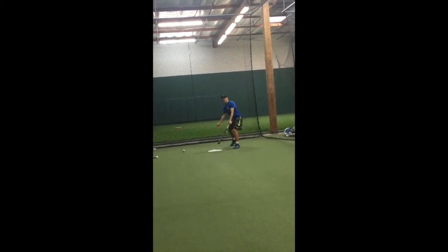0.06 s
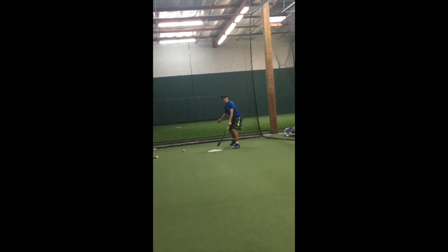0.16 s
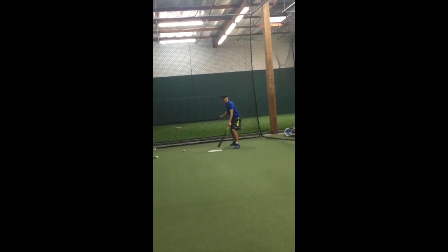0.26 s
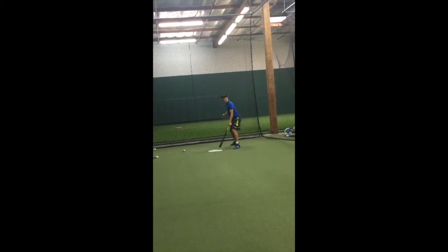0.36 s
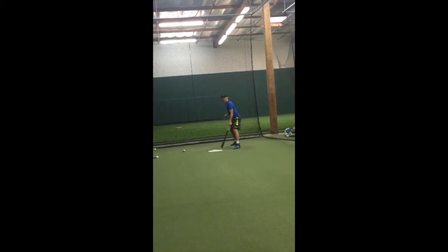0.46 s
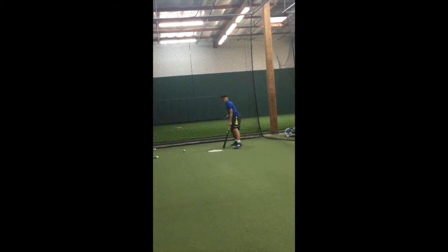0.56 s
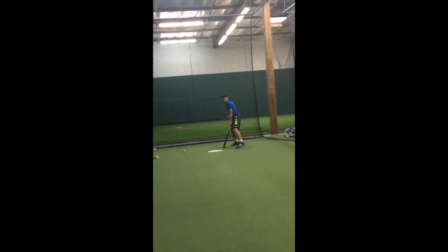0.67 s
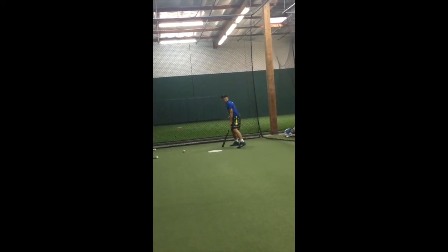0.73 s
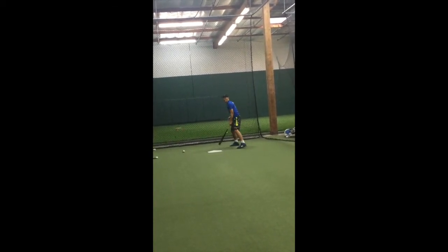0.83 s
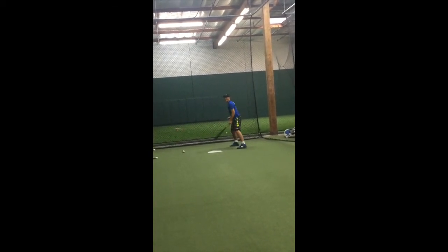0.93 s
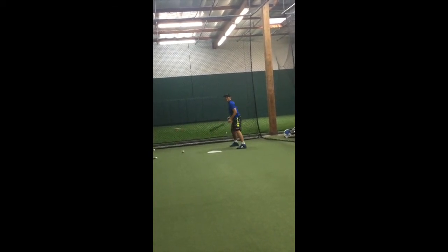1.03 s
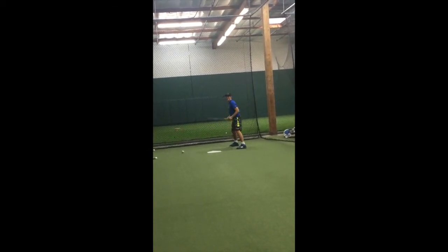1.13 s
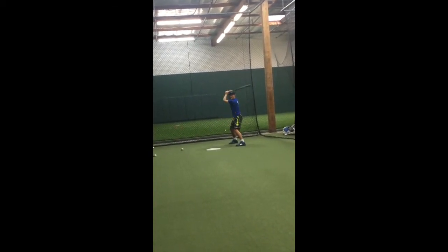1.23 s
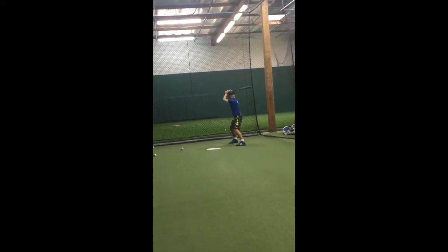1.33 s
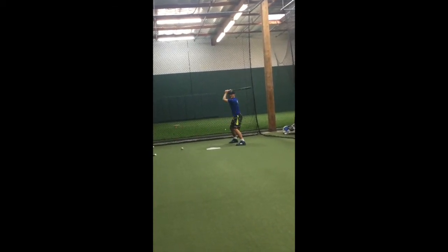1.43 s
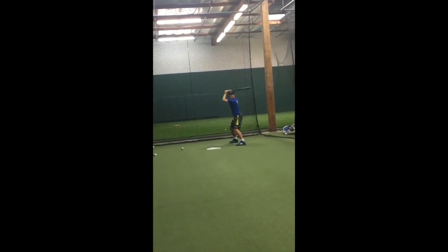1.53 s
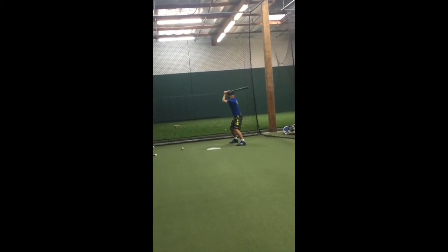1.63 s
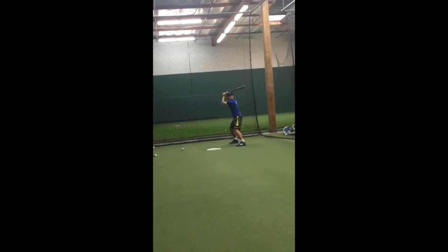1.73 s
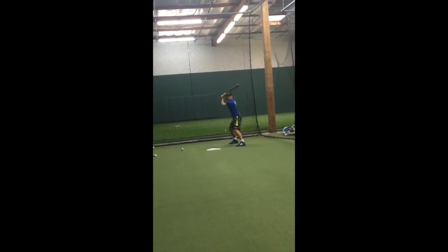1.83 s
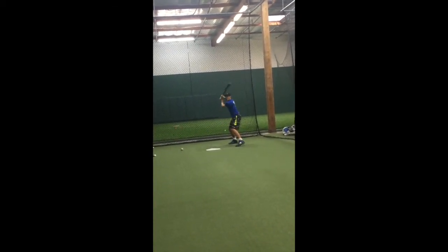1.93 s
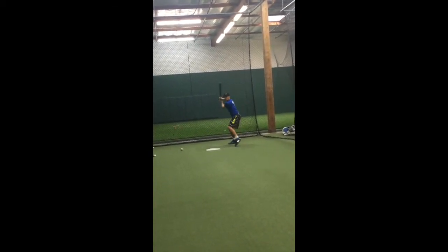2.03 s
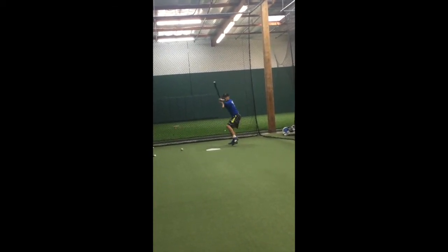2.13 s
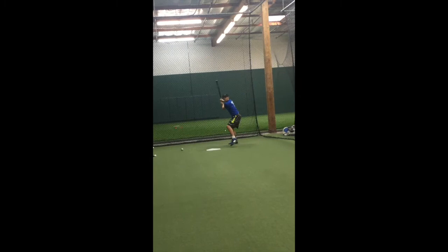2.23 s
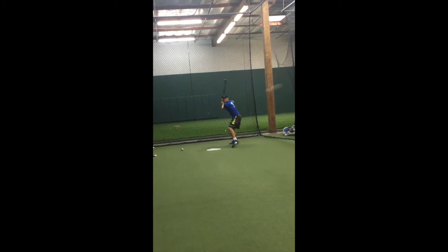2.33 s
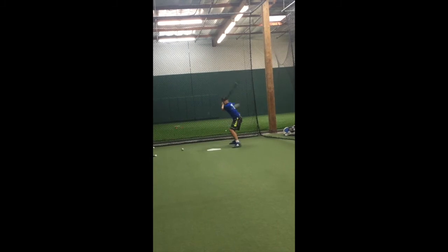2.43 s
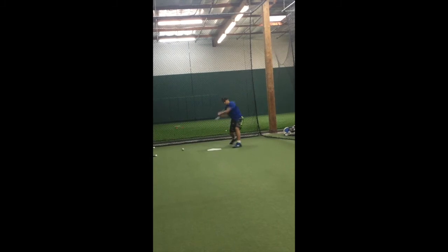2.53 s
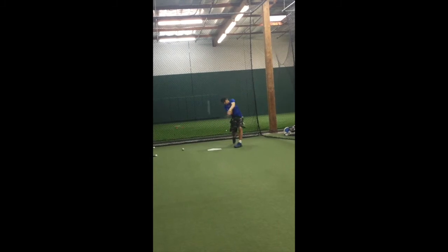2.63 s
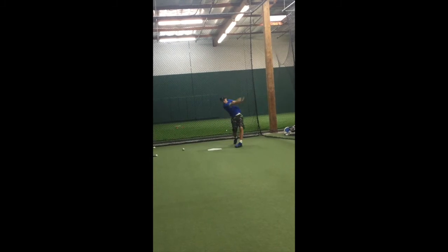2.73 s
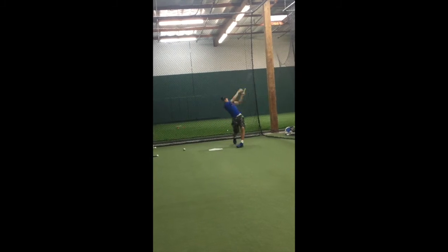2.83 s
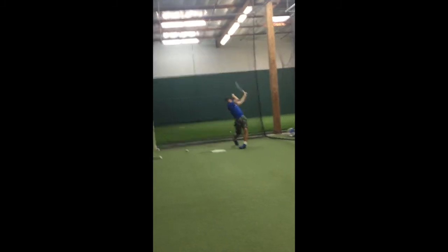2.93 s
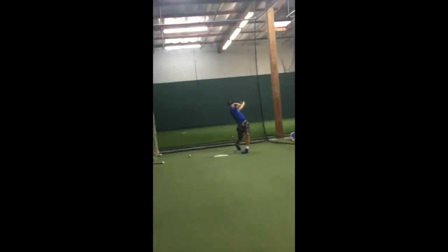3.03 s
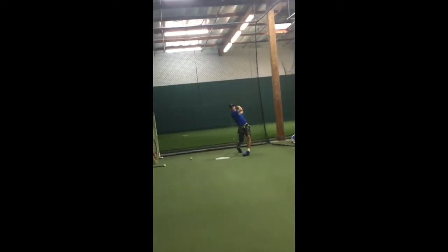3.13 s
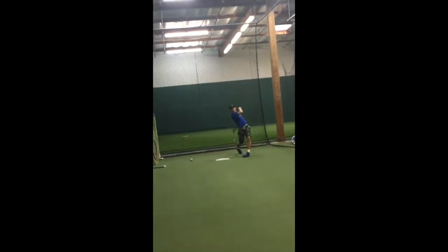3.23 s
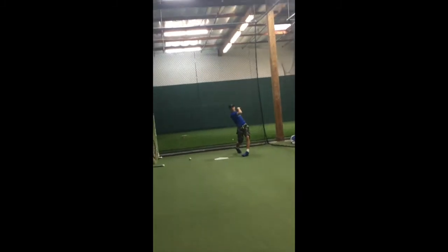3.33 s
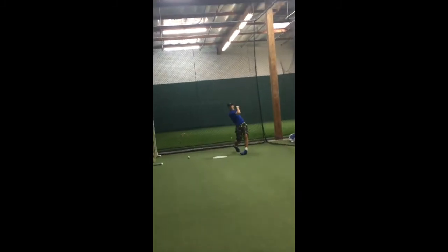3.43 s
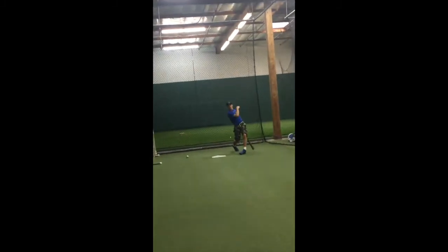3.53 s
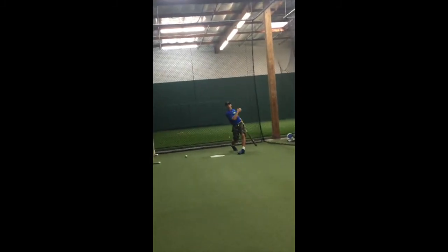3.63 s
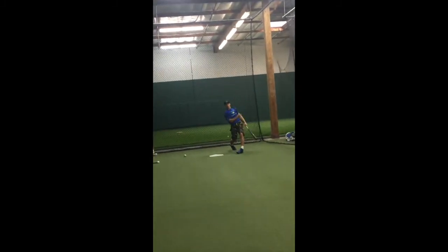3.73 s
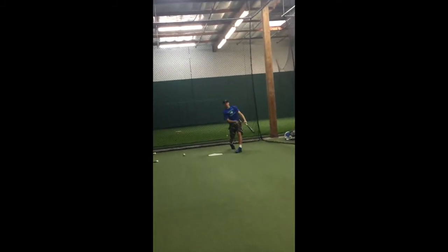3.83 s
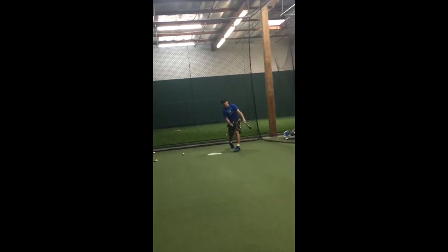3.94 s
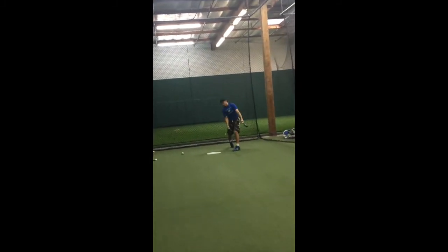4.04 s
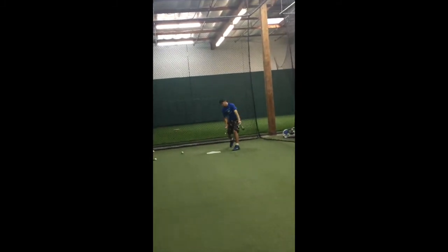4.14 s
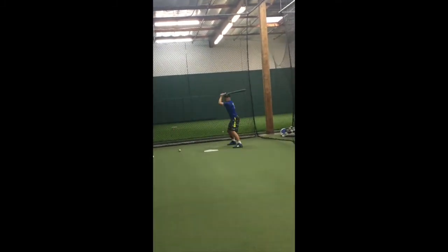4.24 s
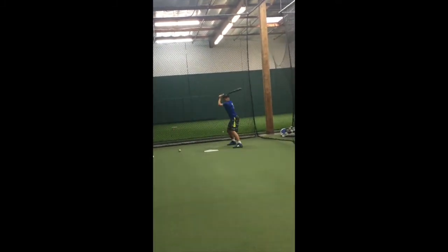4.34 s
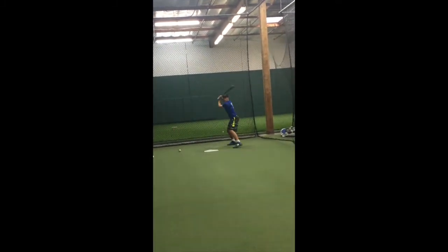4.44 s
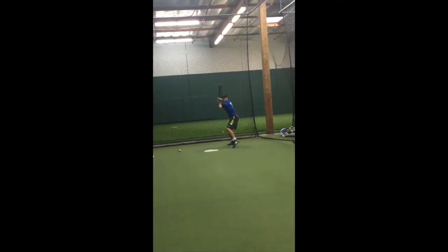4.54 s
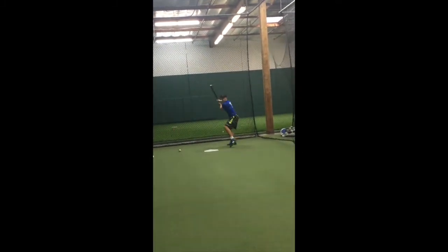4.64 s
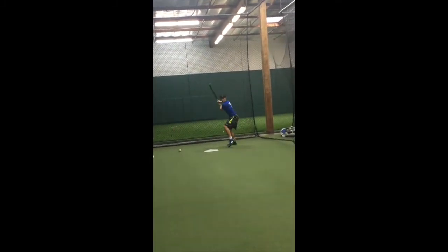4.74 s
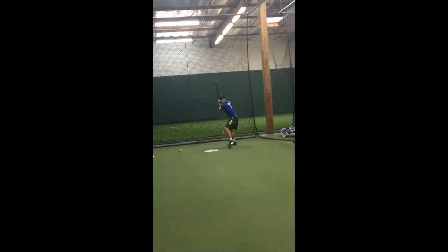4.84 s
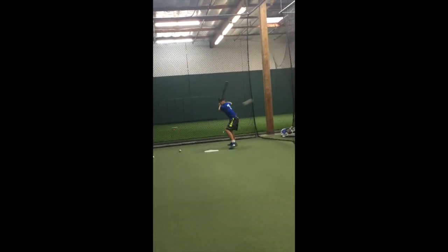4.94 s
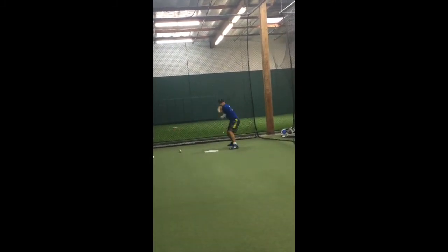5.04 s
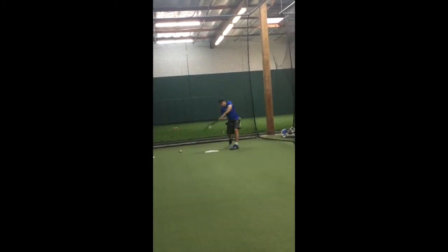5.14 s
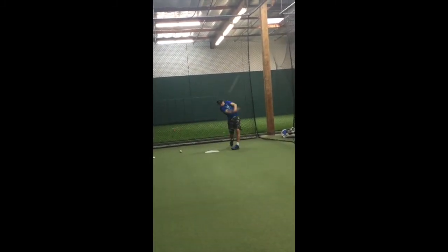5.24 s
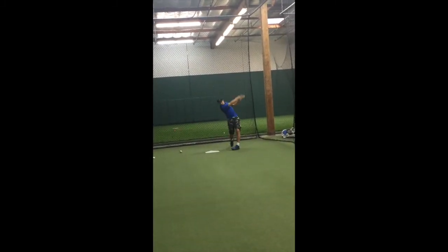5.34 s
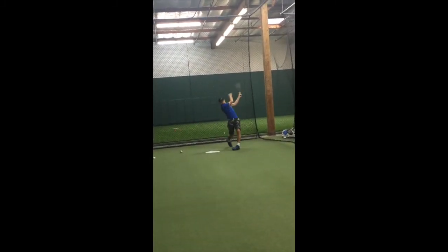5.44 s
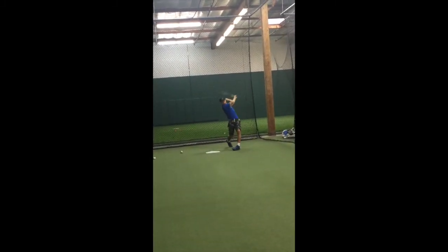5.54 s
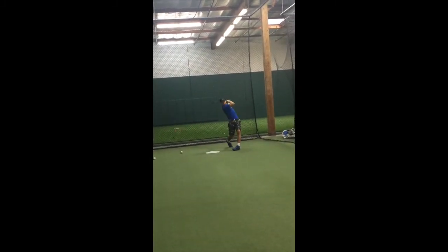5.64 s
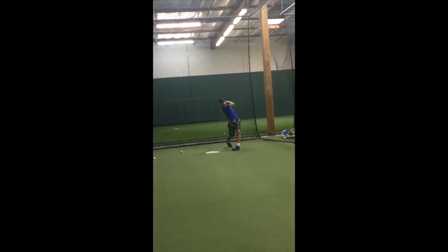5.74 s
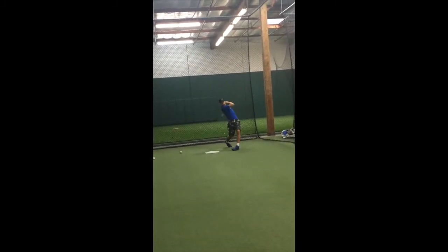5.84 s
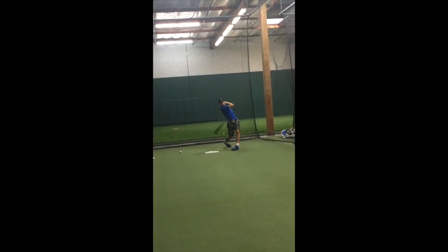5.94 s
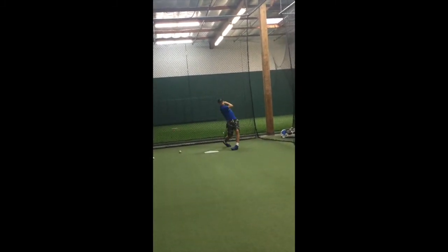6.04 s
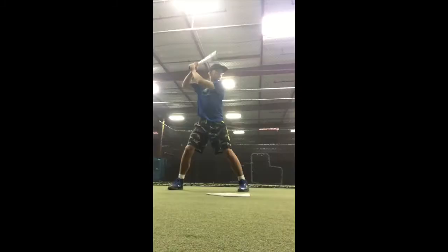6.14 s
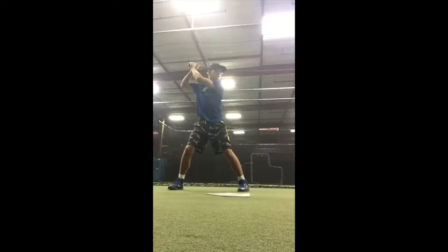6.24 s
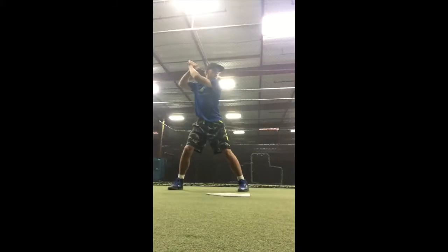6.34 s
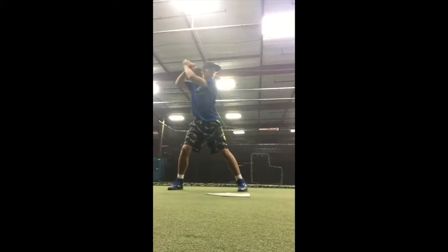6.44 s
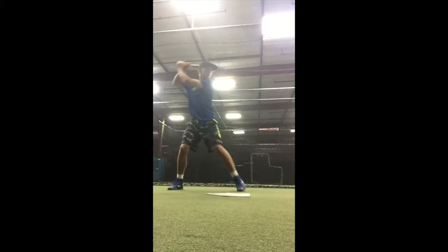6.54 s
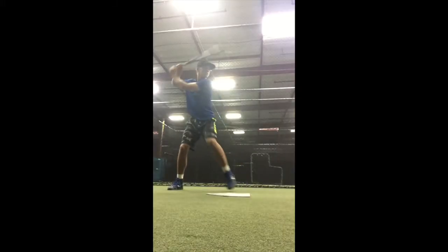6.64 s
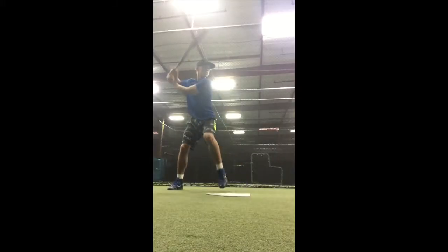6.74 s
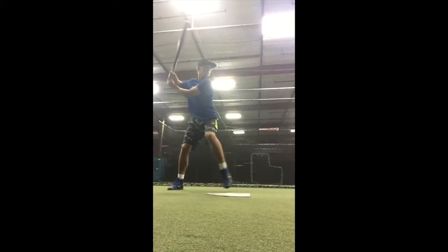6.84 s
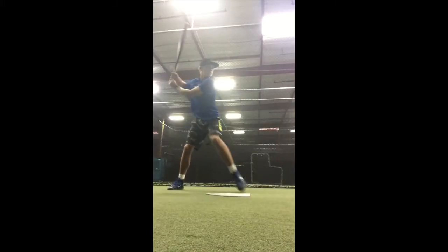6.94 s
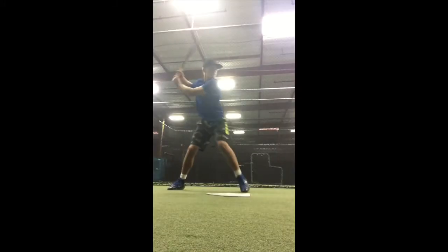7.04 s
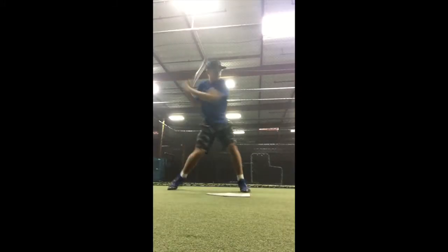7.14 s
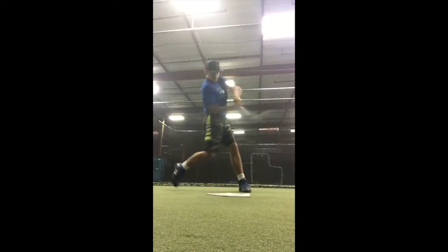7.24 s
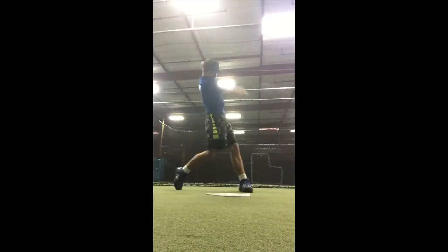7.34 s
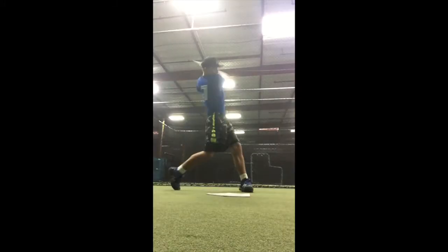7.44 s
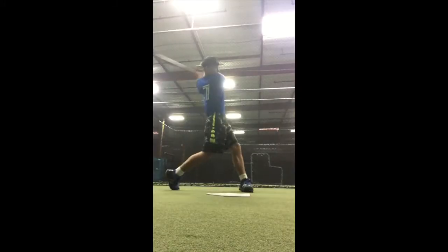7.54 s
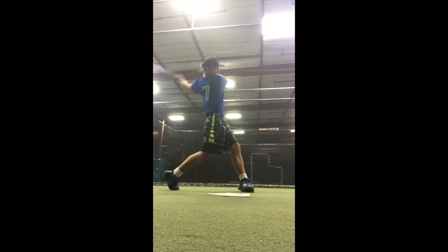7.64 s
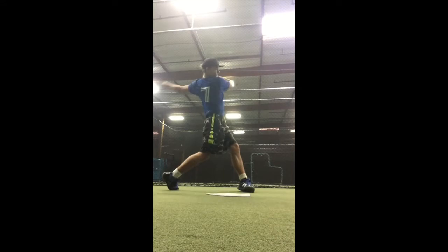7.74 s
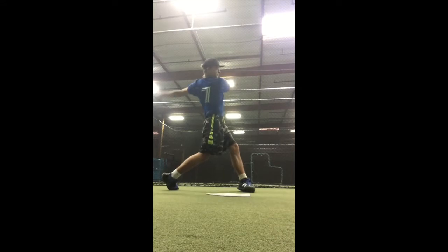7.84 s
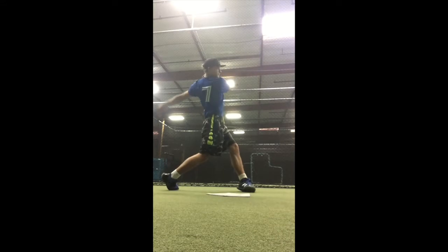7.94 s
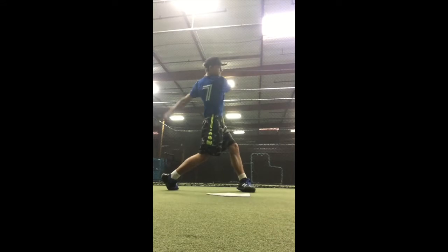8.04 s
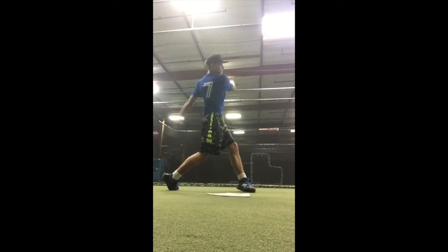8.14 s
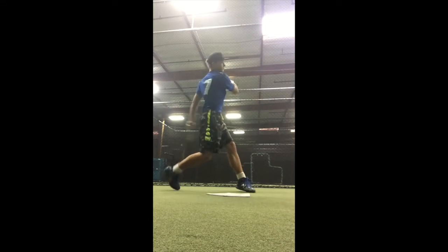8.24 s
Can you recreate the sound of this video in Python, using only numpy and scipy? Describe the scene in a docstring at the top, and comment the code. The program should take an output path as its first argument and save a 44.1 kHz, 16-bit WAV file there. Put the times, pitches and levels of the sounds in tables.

```python
"""Batting practice in a large metal-roofed hall, over rumbling ventilation (coloured noise).
First the hall still rings from an earlier hit; knocks (pulse and click), a bat scrape and a shoe scuff follow.
At 2.7 s and 5.3 s a bat cracks across the turf (noise snap, damped modes, wall slaps); nets hiss as noise.
The first hit's ring is cut at 4.3 s. At 6.1 s the microphone jumps close: ringing stops, the rumble weakens.
At 7.3 s a close crack comes with a rush of air, then follow-through, net and hall; each crack overloads."""
import sys
import numpy as np
from scipy import signal
from scipy.fft import rfft, irfft, next_fast_len
from scipy.io import wavfile
from scipy.ndimage import uniform_filter1d

SR = 44100
rng = np.random.default_rng(int(sys.argv[2]) if len(sys.argv) > 2 else 0)


def unload_wav(signal):
    """Save mono or channel-first audio to the path in sys.argv[1] as 16-bit WAV at rate SR, clipped to [-1, 1]."""
    wavfile.write(
        sys.argv[1],
        SR,
        np.round(np.clip(np.atleast_2d(signal).T, -1, 1) * 32767).astype(np.int16),
    )


N = 365148
TIME = np.arange(N) / SR
MOVE_S = 6.133  # the microphone jumps from the far spot to the close one
TOP_HZ = 15600  # upper band limit of the microphone

# Bat on ball: [t/s, crack level/dB, turf bounce re crack/dB, pock re snap and ring/dB,
# first scattered echoes level/dB, hall level/dB, echo brightness/(dB per octave),
# flight to the net t/s, net level/dB]
HITS = [(2.7117, 1, -9, -24, -22.5, -22.5, 1.13, 0.17, -41.5),
        (5.2656, -3.5, -1.5, -11, -19.5, -25, -1.1, .2454, -35),
        (7.3122, -0.5, -6, -1.5, -21, -28, -0.97, .2778, -42.5)]
# Short ring of bat and ball: [f/Hz, level/dB, t60/s]
BAT_MODES = [(1060, -23, 0.046), (1390, -17, 0.033), (2214, -12, .02), (2560, -7, 0.018), (2964, -9, 0.026),
             (3150, -2.5, 0.015), (3990, -10, 0.011), (6210, -17.5, .012)]
# Low bending modes of the bat, inside the pock: [f/Hz, level/dB, t60/s]
BENDING_MODES = [(320, -9.5, 0.033), (566, -12, 0.035), (822, -9.5, 0.02), (1074, -3.5, 0.034)]
# Knocks and footfalls: [t/s, thump f/Hz, thump level/dB, click level/dB]
KNOCKS = [(0.1203, 122, -31, -31), (1.0634, 221, -32, -42.5), (3.955, 189, -24.5, -35),
          (4.72, 122, -37, -57.5), (6.194, 111, -50, -59.5), (7.021, 100, -51, -65)]
# Rubs of shoes and clothes in every swing: weight shift, front foot lift, stride, hips and bat coming round
# [lead before contact at unit slowness t/s, far level/dB, close level/dB, rise t/s, fall t/s,
# treble tilt before the spot's own/(dB per octave)]
SWING_RUBS = [(.715, -65, -63, 0.053, 0.058, 0.5), (.542, -61, -68.5, 0.018, .028, 2.5),
              (0.13, -64.5, -56, 0.055, .04, 2.5), (.03, -57, -46.5, .036, .08, 4)]
# Further single scuffs, between and during swings: [peak t/s, level/dB, fall t/s]
SCUFFS = [(1.599, -60, 0.028), (3.985, -55, 0.082), (4.47, -64, 0.027), (7.027, -54, 0.013)]
# Resonances of the scraped bat tip: [f/Hz, width f/Hz, relative level/dB]
SCRAPE_MODES = [(976, 110, 4), (2400, 90, -7), (3460, 91, -7), (4300, 120, -13), (5950, 63, -15)]
# The net stirs again: [t/s, level/dB, t60/s]
RUSTLES = [(3.19, -58, 0.33), (3.582, -58.5, 0.16), (5.8, -59, 2.5), (8.115, -55, 0.21)]
# Metal fittings of the net: [t/s, f/Hz, level/dB, t60/s]
JINGLES = [(5.579, 9160, -53, 0.53), (5.8, 11450, -75, 1.4)]
# When ringing and net hiss break off: [t/s]
CUTS_S = [4.3, MOVE_S]
# Decay time of the hall: [f/Hz, t60/s]
HALL_T60 = [(100, 0.86), (500, 2.34), (1200, 2.55), (3000, 2.595), (5000, 1.51), (8000, 1.05), (14000, .6)]

# Noise colours, all [f/Hz, relative level/dB per Hz]: snap of the contact
SNAP_COLOUR = [(40, -20), (250, -9.5), (500, -15.5), (1000, -9), (2000, -1), (3100, -1.5), (4700, -8.5),
               (6500, -8.5), (8500, -14.5), (12500, -19), (16000, -22)]
# Echoes off near surfaces and walls: [f/Hz, relative level/dB per Hz]
WALL_COLOUR = [(40, -26), (250, -15), (500, -12), (1000, -5.5), (2000, 1), (3100, 1.5), (4300, -4),
               (6000, -7), (7500, -15), (12000, -20.5), (16000, -26.5)]
# Reverberation of the sharp, bright cracks: [f/Hz, relative level/dB per Hz]
HALL_BRIGHT = [(40, -17), (120, -11), (400, -16), (780, -12.5), (1250, -5), (1850, -6), (2350, -2),
               (3100, -1.5), (3800, -7), (5500, -10), (7700, -20), (15000, -35)]
# Reverberation of the lower crack: [f/Hz, relative level/dB per Hz]
HALL_LOW = [(40, -15), (110, -3), (350, -4.5), (650, -13), (870, -6.5), (1030, 4), (1250, -4), (1560, 1.5),
            (1850, -2), (2900, -4), (4200, -6.5), (6000, -6), (9000, -20), (15000, -35)]
# Reverberation left from an earlier hit: [f/Hz, relative level/dB per Hz]
HALL_EARLIER = [(100, -5), (700, -21), (1050, -1.5), (1300, -2), (1650, 2), (2600, -4), (3300, -10.5),
                (5000, -19), (12000, -19)]
# Click of a knock: [f/Hz, relative level/dB per Hz]
KNOCK_COLOUR = [(60, -8.5), (200, 10), (380, 7.5), (600, -1.5), (950, 4), (1300, -2.5), (2000, -1),
                (3500, -9), (5000, -23), (8000, -37), (15000, -51)]
# Shoe or cloth: [f/Hz, relative level/dB per Hz]
RUB_COLOUR = [(100, -13), (500, -9), (1100, 1), (2300, 0.5), (4000, -8.5), (7000, -15.5), (15000, -36.5)]
# Netting: [f/Hz, relative level/dB per Hz]
NET_COLOUR = [(500, -40), (2500, 12), (5000, 9.5), (9000, 0.5), (15000, -12)]
# Ventilation at the far spot: [f/Hz, relative level/dB per Hz]
RUMBLE_FAR = [(22, -34.5), (45, -0.5), (75, 4.5), (130, 0.5), (210, -3), (330, -10), (500, -19),
              (1000, -30.5), (3000, -35), (7000, -43.5), (15000, -51.5)]
# Ventilation close by, squashed ball, air ahead of the bat, follow-through: [f/Hz, relative level/dB per Hz]
RUMBLE_CLOSE = [(20, -22.5), (50, 0.5), (85, 1.0), (150, -7.0), (400, -19), (1500, -18.5),
                (4000, -26.5), (15000, -38)]
SQUASH_COLOUR = [(60, -20.5), (150, -11.5), (280, -0.5), (900, 1), (1300, -4.5), (2500, -26)]
AIR_COLOUR = [(30, -12), (110, -1), (200, -15.5), (400, -12), (1500, -28.5), (8000, -47.5)]
FOLLOW_COLOUR = [(20, -8), (45, -6), (85, 1.5), (160, -14), (400, -29.5), (2000, -58)]

NET_T60, SCATTER_T60 = .53, .5  # s, net after a catch; first scattered echoes
SLAP_S, SLAP_DB, SLAP_EDGE_HZ = .0994, -6, 4700  # first answer of a far wall
ROUND_TRIP_S = .2555  # there and back between the walls
# Wall-to-wall echoes: reference level, loss a round trip, treble edge
FLUTTER_DB, FLUTTER_LOSS_DB, FLUTTER_EDGE_HZ = -18, 6, 4250
KNOCK_NEAR_DB, KNOCK_HALL_DB = -11, -26  # nearby surfaces and hall, relative to the click
SCUFF_RISE, SCUFF_TILT_DB = 0.48, -0.4  # rise as a share of the fall; treble per octave
# The two microphone spots: nearby reflections (start, hold, decay in s; level re crack in dB),
# colour of the reverberation of the cracks heard there, stretch of the swing's timing,
# extra treble of its rubs in dB per octave
FAR = dict(near_delay_s=.012, near_length_s=.0115, near_t60=.04, near_db=-13.8,
           hall=HALL_BRIGHT, slowness=1, rub_tilt_db=0)
CLOSE = dict(near_delay_s=.0293, near_length_s=.002, near_t60=.07, near_db=-18.5,
             hall=HALL_LOW, slowness=1.17, rub_tilt_db=-4)


def hits():
    """Each crack arrives directly, off the turf, off nearby surfaces, off the walls, and as reverberation."""
    out, t = np.zeros(N), TIME[:SR]
    for s, db, turf_db, pock_db, scatter_db, hall_db, tilt_db, _, _ in HITS:
        swing, spot = np.zeros(N), spot_at(s)
        delay = spot["near_delay_s"]
        add(swing, s, amp(db) * crack(pock_db))
        add(swing, s + .0038, amp(db + turf_db) * crack(pock_db - 6.0))
        # nearby surfaces: silent until the delay, held, then decaying
        held = np.maximum(t - delay - spot["near_length_s"], 0)
        cluster = (t > delay) * fade(held, spot["near_t60"])
        add(swing, s, amp(db + spot["near_db"]) * cluster * noise(WALL_COLOUR, SR, tilt_db))
        scatter = fade(t, SCATTER_T60) * (1 - np.exp(-t / delay))
        scattered = scatter * noise(WALL_COLOUR, SR, tilt_db - .5)
        add(swing, s, amp(scatter_db) * ragged(scattered, depth=0.71))
        add(swing, s, amp(hall_db) * ragged(hall_tail(spot["hall"], tilt_db), depth=.25))
        if spot is FAR:  # this spot lies in the path of the wall-to-wall flutter
            add(swing, s, flutter(pock_db))
        out += swing * until_cut(s)
    # the hall still rings from an earlier hit
    earlier = hall_tail(HALL_EARLIER) * fade(TIME[:3 * SR], 10.6)
    add(out, -.85, amp(-23.5) * earlier)
    return out


def crack(pock_db):
    """A splintery snap, the bat's short ring, and a low pock from the bending bat and the squashed ball."""
    t = TIME[:SR // 8]
    snap = noise(SNAP_COLOUR, len(t)) * fade(t, 0.013)
    squash = noise(SQUASH_COLOUR, len(t)) * fade(t, 0.029)
    pock = ringing(BENDING_MODES, t) + amp(-4) * squash
    return amp(-3.5) * snap + ringing(BAT_MODES, t) + amp(pock_db) * pock


def ringing(modes, t):
    """Damped modes, a little different in strength and pitch at every blow."""
    out = np.zeros(len(t))
    for hz, db, t60 in modes:
        gain = amp(db + rng.normal(0, 0.68))
        pitch = hz * rng.normal(1, 0.0087)
        phase = rng.uniform(0, 2 * np.pi)
        out += gain * np.sin(2 * np.pi * pitch * t + phase) * fade(t, t60)
    return out


def flutter(pock_db, count=3):
    """A far wall slaps back; then crack and slap shuttle between the walls, weaker at every round trip."""
    out = np.zeros(SR)
    add(out, SLAP_S, amp(SLAP_DB) * slap(pock_db, SLAP_EDGE_HZ))
    for trip in range(count):
        for lag in (0, SLAP_S):
            db = FLUTTER_DB - FLUTTER_LOSS_DB * (trip + lag / ROUND_TRIP_S)
            add(out, (trip + 1) * ROUND_TRIP_S + lag, amp(db) * slap(pock_db, FLUTTER_EDGE_HZ))
    return out


def slap(pock_db, edge_hz):
    """A distant wall returns the crack thinner and duller: a band-passed, shortened contact."""
    band = signal.butter(3, [600, edge_hz], "bandpass", fs=SR, output="sos")
    return signal.sosfilt(band, crack(pock_db) * fade(TIME[:SR // 8], 0.0085))


def swish():
    """Close by, the bat pushes a low rush of air around contact; the follow-through rumbles softly."""
    air = noise(AIR_COLOUR, N) * swell(TIME - 7.298, .018, .016)
    follow_through = noise(FOLLOW_COLOUR, N) * swell(TIME - 7.66, 0.29, 0.24)
    return amp(-39) * air + amp(-52.5) * follow_through


def knocks():
    """Knocks and footfalls: a dead thump and a click, answered by nearby surfaces and faintly by the hall."""
    out, t = np.zeros(N), TIME[:SR]
    for s, hz, thump_db, click_db in KNOCKS:
        thump = -np.sin(2 * np.pi * hz * t) * swell(t - .005, 0.0017, 0.003)
        envelope = fade(t, 0.054) + amp(KNOCK_NEAR_DB) * fade(t - .021, 0.44)
        click = noise(KNOCK_COLOUR, SR) * envelope
        add(out, s, amp(thump_db) * thump + amp(click_db) * click)
        add(out, s, amp(click_db + KNOCK_HALL_DB) * hall_tail(KNOCK_COLOUR, build_s=0.0067))
    return out


def scuffs():
    """Friction of shoes and clothes: the same four rubs before every ball, and further single scuffs."""
    out = np.zeros(N)
    for s, *_ in HITS:
        spot = spot_at(s)
        for lead, far_db, close_db, rise, fall, tilt_db in SWING_RUBS:
            db = far_db if spot is FAR else close_db
            stroke = rub(rise, fall, tilt_db + spot["rub_tilt_db"])
            add(out, s - lead * spot["slowness"] - .5, amp(db) * stroke)
    for s, db, fall in SCUFFS:
        add(out, s - .5, amp(db) * rub(SCUFF_RISE * fall, fall, SCUFF_TILT_DB))
    return out


def rub(rise, fall, tilt_db):
    """One grainy stroke of shoe or cloth with a faint hall tail; a second long, its peak in the middle."""
    t = TIME[:SR] - .5
    grain = amp(2.3 * unit(uniform_filter1d(rng.standard_normal(SR), size=200)))
    texture = unit(ragged(grain * noise(RUB_COLOUR, SR, tilt_db), depth=0.33, t60=.02))
    return (swell(t, rise, fall) + amp(-17.5) * fade(t, 1.2)) * texture


def scrape():
    """Friction at the bat's tip on the turf excites narrow resonances in two strokes, with one hissing rub."""
    def body(f):
        return sum(amp(db) * 1j * f * width / (centre ** 2 - f * f + 1j * f * width)
                   for centre, width, db in SCRAPE_MODES)

    first = amp(-53.5) * swell(TIME - .585, 0.018, 0.031)
    second = amp(-56.5) * swell(TIME - .665, 0.0099, 0.013)
    out = (first + second) * unit(filtered(rng.standard_normal(N), body))
    add(out, .619 - .5, amp(-64.5) * rub(rise=0.033, fall=.063, tilt_db=2))
    return out


def net():
    """Netting hisses as it takes each ball and stirs again later; its fittings jingle on unevenly."""
    out, t = np.zeros(N), TIME[:SR]
    catches = [(s + flight_s, db, NET_T60) for s, *_, flight_s, db in HITS]
    for s, db, t60 in catches + list(RUSTLES):
        hiss = np.zeros(N)
        add(hiss, s, amp(db) * noise(NET_COLOUR, SR) * fade(t, t60) * (1 - np.exp(-t / 0.00064)))
        out += hiss * until_cut(s)
    for s, hz, db, t60 in JINGLES:
        # narrow-band noise, half gain 240 Hz either side
        ring = unit(filtered(rng.standard_normal(SR), lambda f: 1 / (1 + ((f - hz) / 240) ** 2)))
        shake = amp(3 * unit(uniform_filter1d(rng.standard_normal(SR), size=900)))
        envelope = fade(t, t60) * (1 - np.exp(-t / 0.011)) * (s + t < MOVE_S)
        add(out, s, amp(db) * ring * shake * envelope)
    return out


def ventilation():
    """Steady rumble as coloured noise, much weaker at the close spot."""
    close = amp(-69.0) * noise(RUMBLE_CLOSE, N)
    far = amp(-53) * noise(RUMBLE_FAR, N)
    return np.where(TIME < MOVE_S, far, close)


def hall_tail(spectrum, tilt_db=0, build_s=0.18):
    """Reverberation: unevenly grained noise that builds up, then decays at each frequency's own rate."""
    size = 3 * SR
    echoes = amp(2.2 * unit(uniform_filter1d(rng.standard_normal(size), size=130)))
    hz, t, z = signal.stft(unit(echoes * noise(spectrum, size, tilt_db)), SR, nperseg=512)
    decay = fade(t, along(HALL_T60, hz)[:, None])
    tail = signal.istft(z * decay, SR, nperseg=512)[1][:size]
    return tail * (1 - np.exp(-TIME[:size] / build_s))


def ragged(x, depth, t60=0.069):
    """Convolve in a short random decay, so that each sound has its own fine spectral peaks and dips."""
    chatter = rng.standard_normal(SR // 20) * fade(TIME[:SR // 20], t60)
    chatter /= np.linalg.norm(chatter)
    rough = signal.fftconvolve(x, chatter)[:len(x)]
    return (x + depth * rough) / np.hypot(1, depth)


def spot_at(s):
    """Where the microphone stands at time s."""
    return FAR if s < MOVE_S else CLOSE


def until_cut(s):
    """A gate that shuts at the first cut after time s, over 1.5 ms."""
    cut_s = min([c for c in CUTS_S if c > s], default=np.inf)
    return np.clip((cut_s - TIME) / .0015, 0, 1)


def amp(db):
    """Decibels to gain."""
    return 10 ** (np.asarray(db) / 20)


def unit(x):
    """Scale to rms 1."""
    return x / np.sqrt(np.mean(x ** 2) + 1e-20)


def along(points, hz):
    """(Hz, value) points read on a log frequency axis."""
    f, v = np.transpose(points)
    return np.interp(np.log(hz + 1), np.log(f), v)


def filtered(x, response):
    """x times a response of frequency."""
    size = next_fast_len(len(x) + 8192)
    return irfft(rfft(x, size) * response(np.fft.rfftfreq(size, 1 / SR)), size)[:len(x)]


def noise(spectrum, size, tilt_db=0):
    """Coloured noise of rms 1, its treble tilted per octave (the tilt eases off below 500 Hz)."""
    def colour(hz):
        return amp(along(spectrum, hz) + tilt_db * np.log2(hz + 500))

    return unit(filtered(rng.standard_normal(size), colour))


def fade(t, t60):
    """Exponential decay from t = 0, down 60 dB after t60; silent before."""
    return (t >= 0) * 10 ** (-3 * np.maximum(t, 0) / t60)


def swell(t, rise, fall):
    """A lopsided bell around t = 0; rise and fall are its standard deviations in s."""
    return np.exp(-.5 * (t / np.where(t < 0, rise, fall)) ** 2)


def add(track, s, sound):
    """Mix a sound into the track at time s, trimming what falls outside."""
    start = round(s * SR)
    part = sound[max(-start, 0):max(len(track) - start, 0)]
    track[max(start, 0):][:len(part)] += part


def scene():
    """Everything that reaches the microphone."""
    return (hits() + swish() + knocks() + scuffs() + scrape() + net() + ventilation())[None]


def record(dry):
    """The microphone flattens the cracks' peaks; a steep low-pass closes the band at the top."""
    ceiling, hardness = .54, 6  # full scale = 1; knee exponent
    clipped = dry[0] / (1 + np.abs(dry[0] / ceiling) ** hardness) ** (1 / hardness)
    return filtered(clipped, lambda hz: 1 / np.sqrt(1 + (hz / TOP_HZ) ** 160))[None]


dry = scene()
out = record(dry)
unload_wav(out)
```